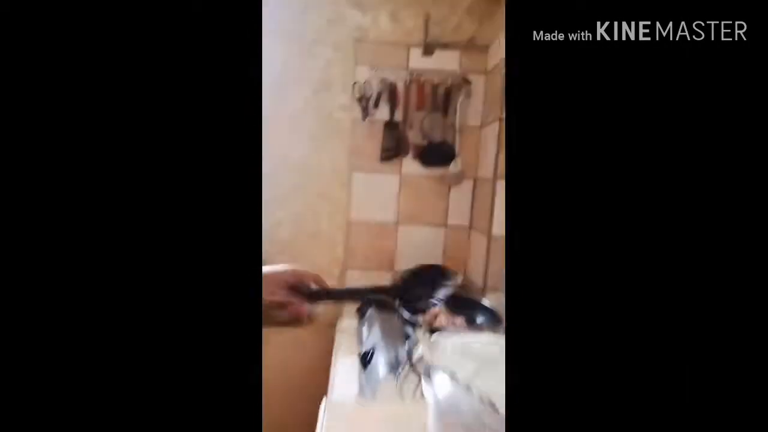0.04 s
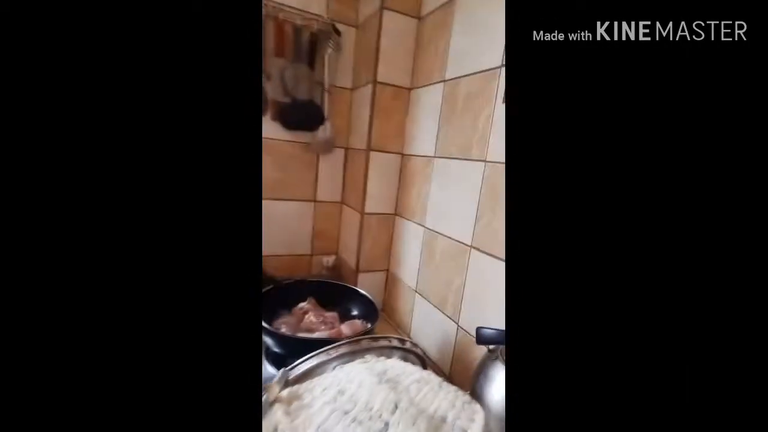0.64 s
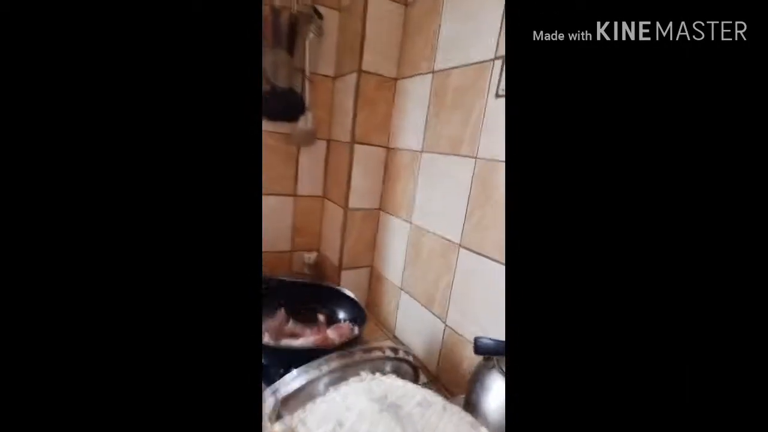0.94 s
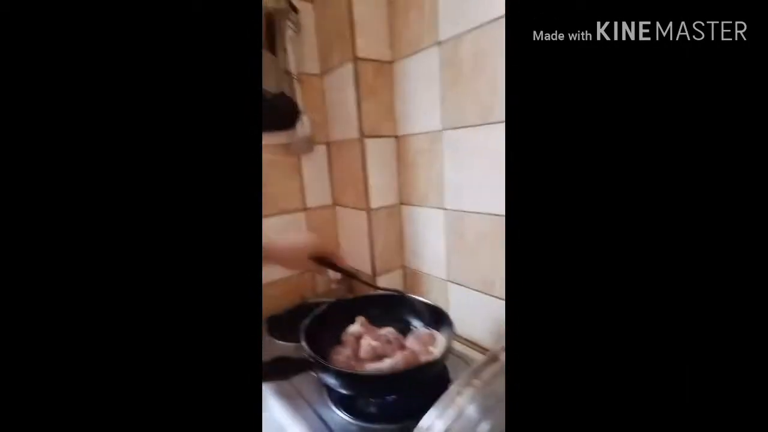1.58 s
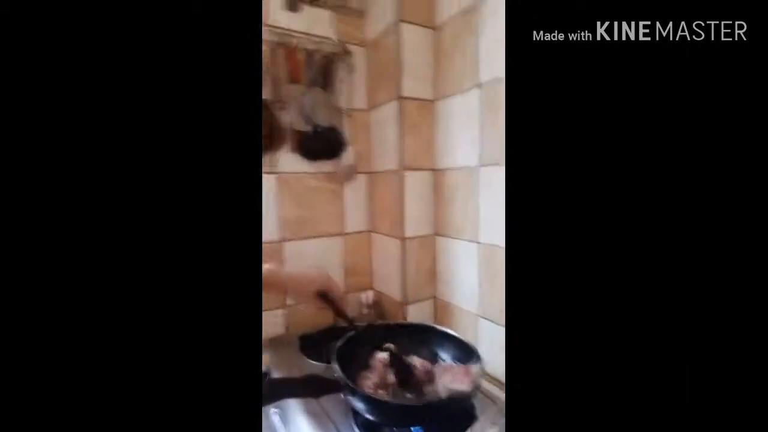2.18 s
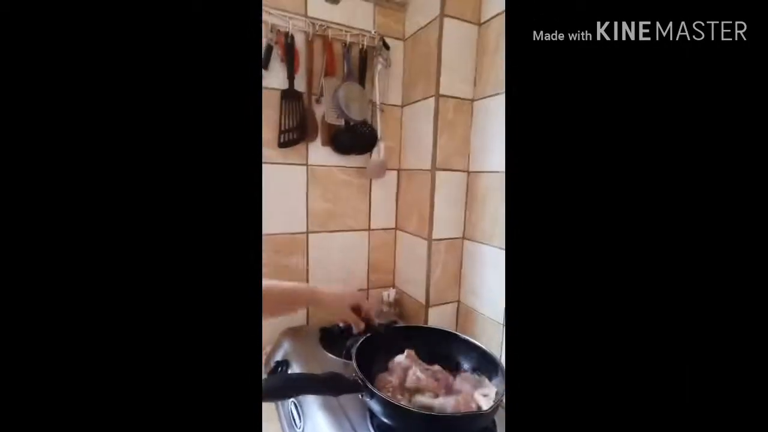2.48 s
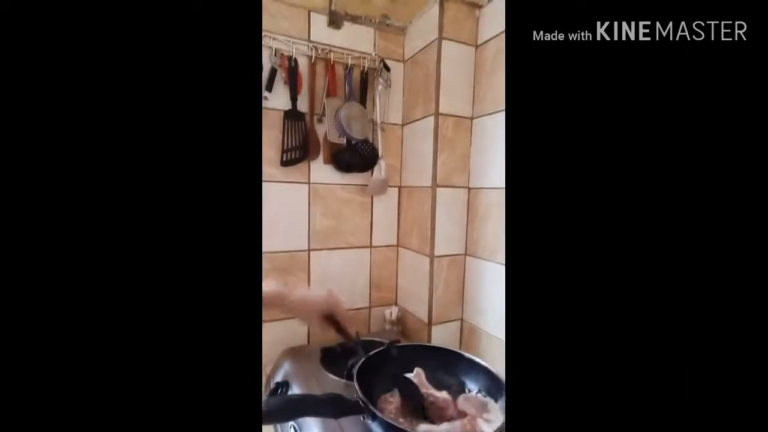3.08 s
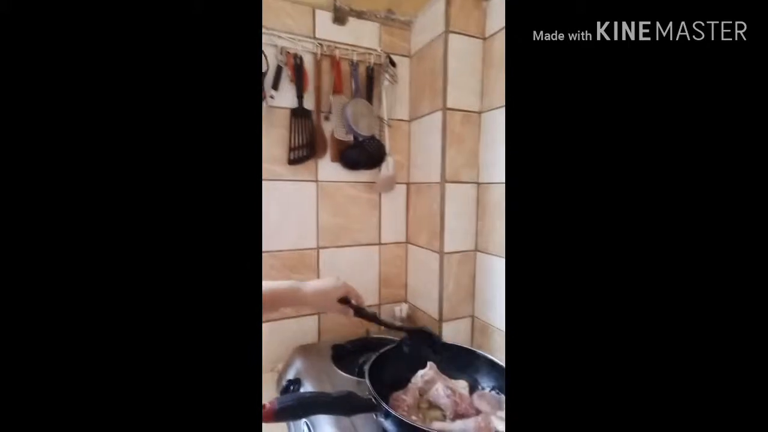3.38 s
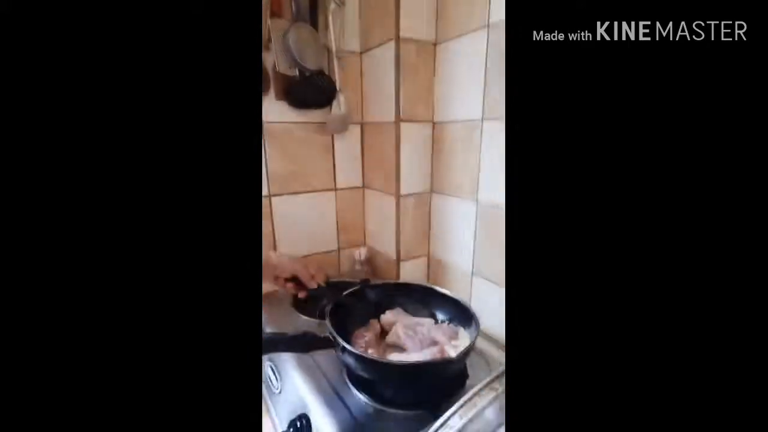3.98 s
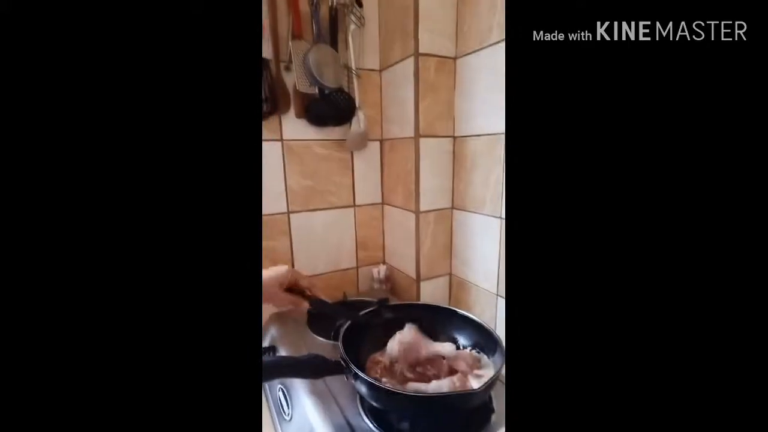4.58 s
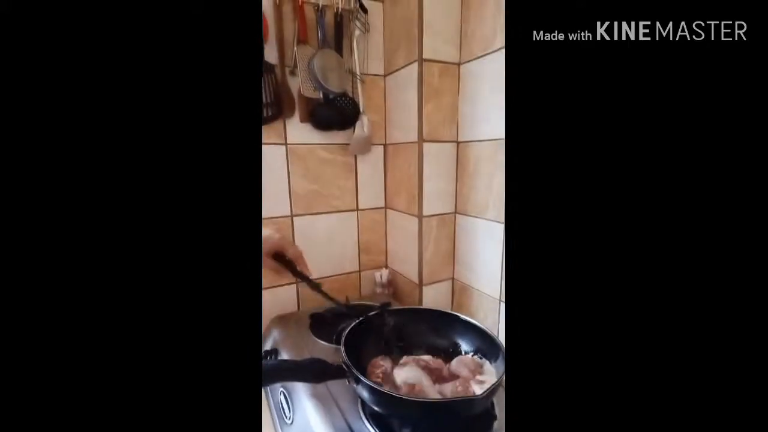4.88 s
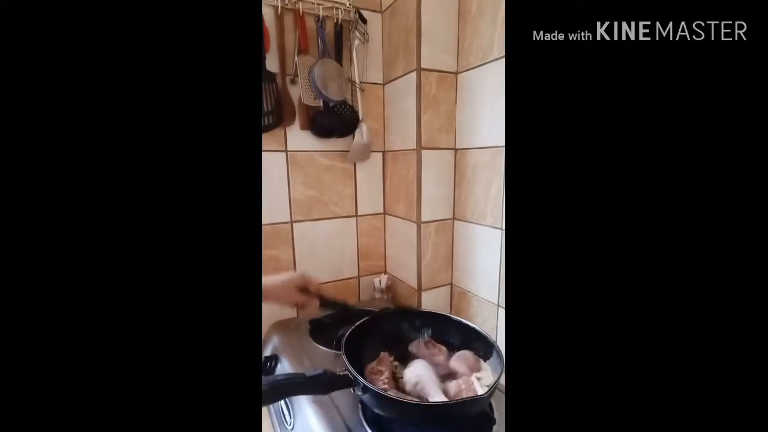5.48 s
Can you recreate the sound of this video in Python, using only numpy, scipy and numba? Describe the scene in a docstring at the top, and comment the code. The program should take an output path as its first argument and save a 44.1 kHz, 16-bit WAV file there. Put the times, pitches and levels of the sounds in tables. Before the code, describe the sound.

In a tiled home kitchen, about a metre from a phone microphone, hot oil hisses and spits around pieces of chicken without a break. A spatula stirs them: first a scrape and soft thuds of meat, then a dull ringing knock, a squeaky scrape and finally a brighter clack on the wok. Faint plops of fat and a low stove rumble sit beneath the frying.

```python
"""A bright sizzle of chicken frying in a wok, about a metre from a phone microphone in a tiled kitchen.
Countless steam bubbles burst in the oil, in short spurts, with a few louder spits. A spatula scrapes
along the steel, sticking and slipping, knocks the wok so that it rings, and turns the pieces, which
land with soft thuds. Underneath lie faint plops of fat and a low stove rumble, with one swell of
handling noise from the phone."""
import sys
import numpy as np
from scipy import signal
from scipy.fft import rfft, irfft
from scipy.io import wavfile
from numba import njit

SR = 44100
rng = np.random.default_rng(int(sys.argv[2]) if len(sys.argv) > 2 else 0)


def put_to_file(sound):
    """Save the sound as 16-bit audio at rate SR, in the file named by the first command-line argument."""
    columns = np.atleast_2d(sound).T  # one column per channel
    safe = np.clip(columns, -1, 1)
    whole_steps = np.round(safe * 32767)
    wavfile.write(sys.argv[1], SR, whole_steps.astype(np.int16))


N = 244304
T = np.arange(N) / SR


# The colour of the sizzle, including the phone microphone's bright resonance near 6.7 kHz.
# Each row: frequency in Hz, relative level in dB.
SIZZLE_COLOUR = [(200, -43.5), (330, -39.5), (480, -18.5), (1000, -15), (1480, -12.5), (1650, -9.5),
                 (2600, -6), (4150, -2.5), (5300, -5.5), (6550, 4), (7200, 2.5), (8200, -4), (12200, -15.5),
                 (15400, -12)]

def sizzle(split_hz=5000, fizz_hz=9500, spurt_db=0.73, flicker_db=0.5, spit_db=-15):
    """Steam bubbles burst in the oil: large ones crackle, small ones hiss, the finest fizz."""
    hiss_db, crackle_db = frying_levels()
    spurts = undb(spurt_db * wander(18))
    spits = undb(spit_db) * clicks(rate=80, spread_db=2.0, cap_db=4)

    def bursts(bubbles):
        """One size of bubble: it shares the spurts and spits, and flickers by itself."""
        flicker = undb(flicker_db * wander(80))
        return colour(spurts * flicker * bubbles + spits, SIZZLE_COLOUR)

    coarse = band(bursts(clicks(rate=5000, spread_db=0.5, cap_db=2.5)), 124, split_hz)
    hiss = band(bursts(clicks(rate=20000, spread_db=1.5, cap_db=5.5)), split_hz, fizz_hz)
    fizz = band(bursts(clicks(rate=15000, spread_db=6.0, cap_db=4)), fizz_hz, 16750)
    crackle = undb(crackle_db) * (undb(0.54) * coarse + wok_hollow())
    # the fizz comes from the whole film of oil, so it follows the frying level only half as much
    return crackle + undb(hiss_db - 0.72) * hiss + undb(hiss_db / 2 - 18.5) * fizz


# How hard the wok fries. Each row: time in seconds, base levels of hiss and of crackle in dB.
PAN_HEAT = [(0.0, -24.0, -30.5), (0.7, -23.5, -29.5), (1.4, -22.9, -29), (1.95, -22.1, -28.5),
            (2.2, -23.5, -29.5), (2.9, -23, -29.5), (3.2, -23, -29.5), (3.85, -24, -29.5),
            (4.1, -24.5, -29.5), (5.0, -24.5, -31), (5.15, -23.9, -28.5), (5.54, -23.5, -32)]
# Juice meets hot oil. Each row: time in seconds, changes of hiss and of crackle in dB.
JUICE_SPURTS = [(.08, 1.5, -0.5), (.61, -0.5, 3.2), (.69, 2, 2.6), (.83, .7, 4), (1.025, 2.5, 3.5),
                (1.26, -0.5, 2), (1.47, -0.5, 2), (1.62, 0.5, 0), (1.765, 0, 1.5), (2.38, 1.8, 1),
                (3.25, 2.5, 2), (3.78, 1.3, 1), (3.855, 2, 2.5), (4.165, 1.2, 2), (5.33, -1.5, 2)]
# The frying falters. Each row: time in seconds, changes of hiss and of crackle in dB.
FRYING_LULLS = [(2.185, -2.2, -2.6), (2.455, -5, 0), (3.7, -2.5, 1.5), (4.235, -0.5, -1.5)]

def frying_levels(spurt_s=0.046, lull_s=0.026):
    """Hiss and crackle in dB: the slow heat of the pan, with brief spurts and lulls on top."""
    hiss_db, crackle_db = curves(PAN_HEAT)
    for events, length in ((JUICE_SPURTS, spurt_s), (FRYING_LULLS, lull_s)):
        for centre_s, hiss_change, crackle_change in events:
            shape = hump(centre_s, length)
            hiss_db += hiss_change * shape
            crackle_db += crackle_change * shape
    return hiss_db, crackle_db


# The note of the wok's hollow, shifting with the angle to the microphone.
# Each row: time in seconds, note in Hz, level within the crackle in dB.
HOLLOW_NOTE = [(0, 1178, -13.5), (.9, 1120, -16), (1.8, 1215, -17.5), (2.7, 1212, -12.5),
               (3.6, 1250, -13.5), (4.6, 1165, -10.5), (5.54, 1220, -10.5)]
# The hollow's resonances. Each row: multiple of the note, filter width in Hz, relative level in dB.
HOLLOW_MODES = [(.62, 111, -5.5), (1.004, 160, 5), (1.11, 94, 0), (1.39, 169, -0.5), (2.24, 250, 0)]

def wok_hollow():
    """Large bubbles pop and sound the hollow of the wok."""
    note_hz, level_db = curves(HOLLOW_NOTE)
    pops = clicks(rate=2000, spread_db=1.5, cap_db=8)
    ring = sum(undb(db) * resonate(pops, ratio * note_hz, width) for ratio, width, db in HOLLOW_MODES)
    return undb(level_db) * unit(ring)


# The spatula drags along the wok. Each row: start and length in seconds, base level in dB, base pitch
# in Hz, moment of the hardest push in seconds, its rise in dB, its length in seconds.
SPATULA_STROKES = [(1.269, 0.398, -32.5, 592, 1.355, 1.5, 0.087), (1.638, 0.17, -44, 580, 1.73, 0, 0.022),
                   (2.939, 0.323, -36.5, 601, 3.06, 12.5, 0.046)]
# The blade's resonances against the steel. Each row: frequency in Hz, half the filter width in Hz,
# relative level in dB, share of the pitch bend from 0 to 1.
BLADE_MODES = [(630, 40, -3.5, 1), (1060, 46, -9, 0.53), (1120, 370, -16.5, 0.6), (1730, 40, -9.5, 0.22)]

def spatula_scrapes(attack_s=0.051, release_s=0.061, fade_db_per_s=18, grit_db=-9,
                    push_bend_hz=32, seating_hz=60, sag_hz_per_s=70):
    """The blade sticks and slips along the wok, fading as it slows and squeaking under a hard push."""
    out = 0
    for start, length, db, base_hz, push_s, push_db, push_length in SPATULA_STROKES:
        age = np.clip(T - start, 0, length)
        push = hump(push_s, push_length)
        contact = np.clip(np.minimum(age / attack_s, (length - age) / release_s), 0, 1)
        gain = contact * undb(db + 0.5 - fade_db_per_s * age + push_db * push)
        # the pitch rises under the push, sinks as the blade slows and starts low while it seats
        hz = base_hz + push_bend_hz * push - sag_hz_per_s * age - seating_hz * np.exp(-age / attack_s)
        bend = hz / BLADE_MODES[0][0]
        slips = clicks(rate=3600, spread_db=4.5, cap_db=9)
        ring = unit(sum(undb(mode_db) * resonate(slips, mode_hz * bend ** share, 2 * half_width)
                        for mode_hz, half_width, mode_db, share in BLADE_MODES))
        grit = undb(grit_db) * band(slips, 530, 1370, order=2)
        # under firm pressure the slips lock to the resonance and the scrape turns into a low squeak
        lock = 0.92 * push
        squeak_hz = hz * (1 + 0.01245 * wander(58))
        squeak = unit(np.sin(2 * np.pi * np.cumsum(squeak_hz) / SR))
        out += gain * (np.sqrt(1 - lock ** 2) * (ring + grit) + lock * squeak)
    return out


# The spatula strikes the wok. Each row: start in seconds, level in dB, contact hardness as a cutoff
# in Hz, gain of the low modes in dB.
SPATULA_KNOCKS = [(2.081, -21, 2200, -1), (2.090, -28, 500, 9.5), (5.059, -20.5, 4200, -8),
                  (5.072, -24, 3000, -14)]
# The ring of the steel shell. Each row: frequency in Hz, relative level in dB, seconds to fall 60 dB.
WOK_MODES = [(228, -8.5, 0.041), (365.3, -6.5, 0.29), (527, -20, 0.19), (705, -9.5, .05), (1027, -7, 0.059),
             (1300, -4, 0.039), (1860, -0.5, 0.025), (2210, 1.5, 0.047), (2600, 1.5, 0.043)]

def spatula_knocks(crack_db=-9, crack_s=0.014, low_modes_hz=450, radiation_hz=230):
    """Each blow rings the wok; soft contact weakens the high modes, a resting blade damps the low."""
    out = np.zeros(N + SR)
    t = np.arange(SR // 2) / SR
    for start_s, db, hardness_hz, low_db in SPATULA_KNOCKS:
        ring = 0
        for k, (hz, mode_db, t60) in enumerate(WOK_MODES):
            size = undb(mode_db + low_db * (hz < low_modes_hz)) / (1 + (hz / hardness_hz) ** 2)
            # neighbouring modes move in opposite directions at the point of contact
            ring += (-1) ** k * size * np.sin(2 * np.pi * hz * t) * undb(-60 * t / t60)
        noise = band(rng.standard_normal(len(t)), 330, hardness_hz, order=2)
        crack = undb(crack_db) * noise * np.exp(-t / crack_s)
        start = int(start_s * SR)
        out[start:start + len(t)] += undb(db) * (ring + crack)
    # a thin shell radiates little bass
    return signal.sosfilt(signal.butter(4, radiation_hz, "high", fs=SR, output="sos"), out[:N])


# Pieces land (low) or slide over the steel (high).
# Each row: start in seconds, level in dB, pitch in Hz, length in seconds (twice the rise time).
MEAT_MOVES = [(0.024, -49.5, 91.5, 0.045), (0.388, -63, 105, .09), (1.062, -46.5, 310, 0.046),
              (1.588, -45.5, 224, 0.06), (1.626, -41, 222, 0.036), (1.655, -44, 134, 0.041),
              (1.92, -49.5, 438, 0.064), (2.17, -52.5, 248, 0.11), (2.395, -44, 347, .06),
              (2.72, -54, 267, 0.071), (2.8, -50, 70, 0.04), (3.287, -54.5, 121, 0.077),
              (4.158, -57.5, 340, .08), (5.108, -36.5, 1930, 0.12), (5.114, -34.5, 1200, 0.031),
              (5.304, -40.5, 1510, .043), (5.322, -49, 380, 0.061)]

def meat_thuds(relative_width=0.6):
    """Soft meat lands and slides: a dull push that swells and dies away."""
    out = 0
    for start, db, hz, length in MEAT_MOVES:
        age = np.maximum(T - start, 0) / (length / 2)
        body = unit(resonate(rng.standard_normal(N), hz, hz * relative_width))
        out += undb(db) * age * np.exp(1 - age) * body
    return out


def fat_plops(level_db=-62):
    """Fat bubbles under the meat burst now and then, low and hollow."""
    out = 0
    for hz in np.geomspace(310, 520, 4):
        pops = clicks(rate=12, spread_db=3.5, cap_db=4.5)
        out += hz * resonate(pops, hz, width=69)
    return undb(level_db) * unit(out)


# The colour of the low rumble at the microphone. Each row: frequency in Hz, relative level in dB.
RUMBLE_SPECTRUM = [(20, -17), (48, -6), (68, 4), (92, -5), (125, 4.5), (170, -9.5), (245, 2.5), (320, -40),
                   (800, -18)]

def low_rumble(base_db=-63, waver_db=3.5, handling_db=7.5, start_s=2, end_s=3.68, ramp_s=0.22):
    """A low, wavering rumble, with one swell of handling noise from the phone."""
    handling = np.clip(np.minimum(T - start_s, end_s - T) / ramp_s, 0, 1)
    gain = undb(base_db + handling_db * handling + waver_db * wander(6.2))
    return gain * unit(colour(rng.standard_normal(N), RUMBLE_SPECTRUM))


def tiled_kitchen(x, t60_s=0.24, tail_db=-10):
    """Close tiled walls add a short, bright tail, whose pattern keeps changing as the phone moves."""
    t = np.arange(SR // 4) / SR
    decay = undb(-60 * t / t60_s)
    wet = np.zeros(N + len(t))
    for part in np.array_split(np.arange(N), 24):
        tail = rng.standard_normal(len(t)) * decay
        wet[part[0]:part[-1] + len(t)] += signal.fftconvolve(x[part], tail / np.linalg.norm(tail))
    return x + undb(tail_db) * wet[:N]


def undb(db):
    """Decibels to gain."""
    return 10 ** (np.asarray(db) / 20)


def unit(x):
    """Scale to rms 1."""
    return x / np.sqrt(np.mean(x ** 2) + 1e-18)


def curves(table):
    """The columns of a timed table, joined by straight lines."""
    times, *columns = np.transpose(table)
    return [np.interp(T, times, column) for column in columns]


def hump(centre_s, length):
    """A smooth rise to 1 and back, `length` seconds wide at half height."""
    return 0.5 ** ((2 * (T - centre_s) / length) ** 2)


def wander(rate):
    """Smooth random drift of rms 1, with about `rate` turns a second."""
    hz = np.arange(N // 2 + 1) * SR / N
    return unit(irfft(rfft(rng.standard_normal(N)) / (1 + (hz / rate) ** 2), N))


def clicks(rate, spread_db, cap_db):
    """Random clicks, `rate` a second, the larger ones up to `cap_db` above the smallest."""
    present = rng.random(N) < rate / SR
    size_db = np.minimum(spread_db * rng.exponential(size=N), cap_db)
    return unit(present * undb(size_db) * rng.choice([-1, 1], N))


def band(x, lo_hz, hi_hz, order=3):
    """Band-pass, scaled to rms 1."""
    return unit(signal.sosfilt(signal.butter(order, [lo_hz, hi_hz], "band", fs=SR, output="sos"), x))


def colour(x, points, size=4096):
    """Causal filter with the given (Hz, dB) response, so that clicks stay sharp."""
    hz, db = np.transpose(points)
    bin_hz = np.maximum(np.arange(size // 2 + 1) * SR / size, 1)
    gain = undb(np.interp(np.log(bin_hz), np.log(hz), db))
    cepstrum = irfft(np.log(gain))
    # folding the cepstrum gives minimum phase
    cepstrum[1:size // 2] *= 2
    cepstrum[size // 2 + 1:] = 0
    impulse = irfft(np.exp(rfft(cepstrum)))
    return signal.fftconvolve(x, impulse)[:N]


@njit
def moving_bandpass(x, hz, width):
    """State-variable band-pass whose centre can move every sample, gain 1 at the centre."""
    y = np.empty(len(x))
    band_state, low_state = 0., 0.
    for i in range(len(x)):
        tuning, damping = np.tan(np.pi * hz[i] / SR), width / hz[i]
        passed = (band_state + tuning * (x[i] + 1e-18 - low_state)) / (1 + tuning * (tuning + damping))
        band_state = 2 * passed - band_state
        low_state += 2 * tuning * passed
        y[i] = damping * passed
    return y


def resonate(x, hz, width):
    """One resonance, steady or moving, applied twice for steep skirts."""
    hz, width = hz * np.ones(N), float(width)
    return moving_bandpass(moving_bandpass(x, hz, width), hz, width)


def scene():
    """Everything reaches one microphone a metre from the wok, the same in both channels."""
    wok = sizzle() + fat_plops() + spatula_scrapes() + spatula_knocks() + meat_thuds()
    mono = tiled_kitchen(wok) + low_rumble()
    return np.array([mono, mono])


def record(dry, top_hz=15480):
    """The phone cuts the top of the treble steeply."""
    return signal.sosfilt(signal.ellip(12, 0.1, 90, top_hz, fs=SR, output="sos"), dry)


dry = scene()
out = record(dry)
put_to_file(out)
```